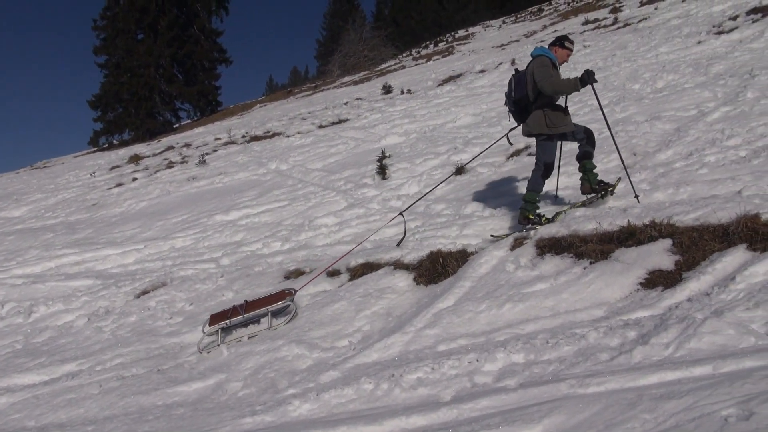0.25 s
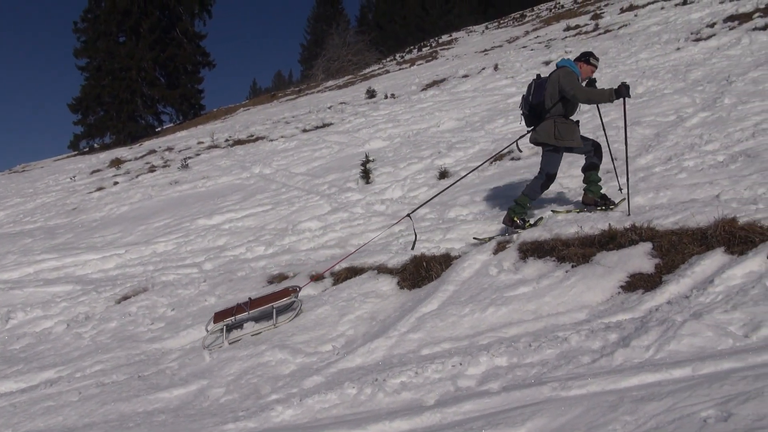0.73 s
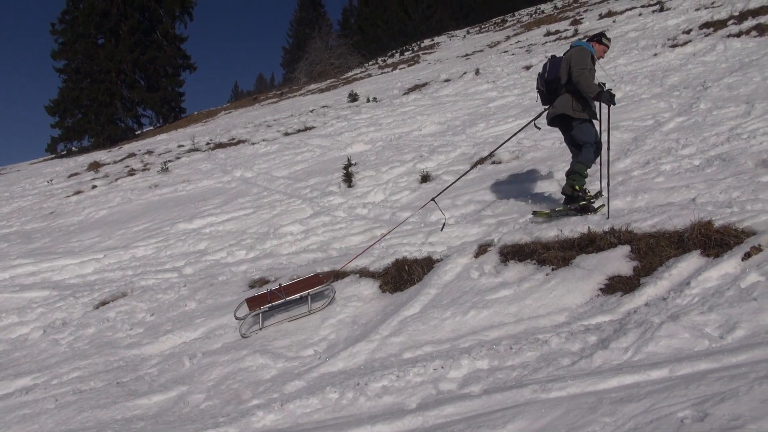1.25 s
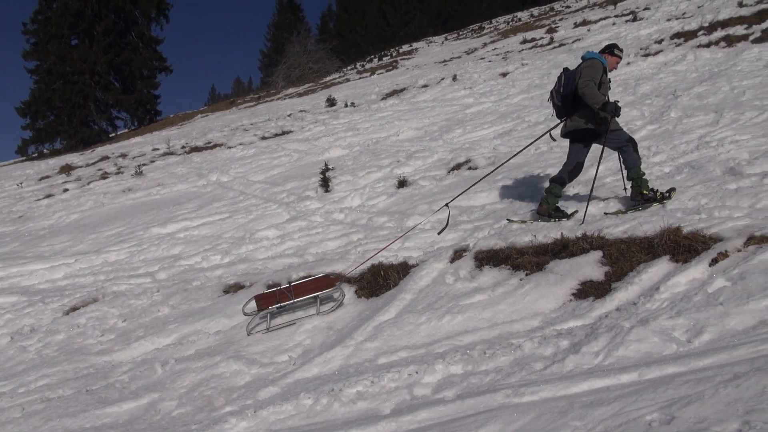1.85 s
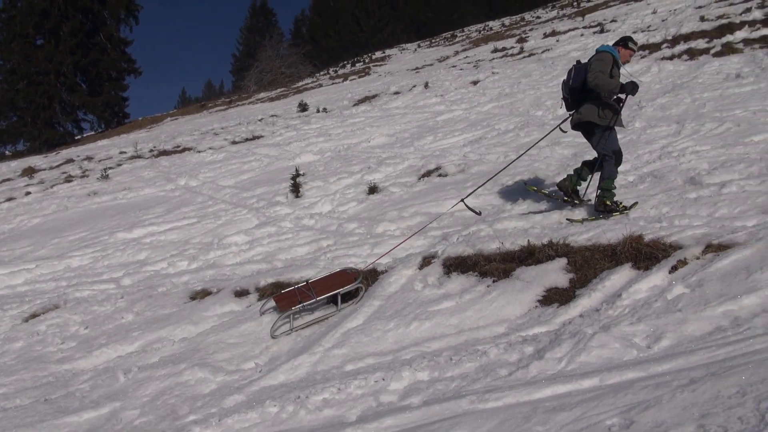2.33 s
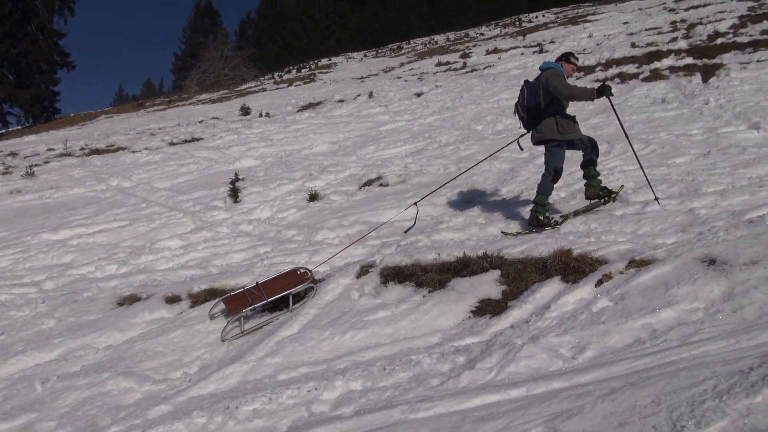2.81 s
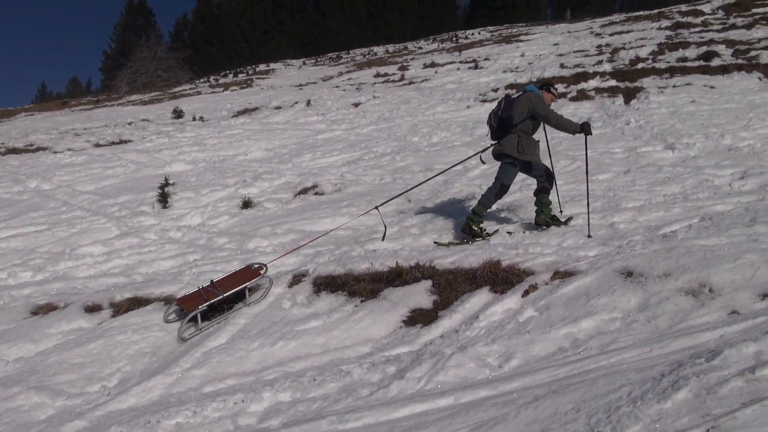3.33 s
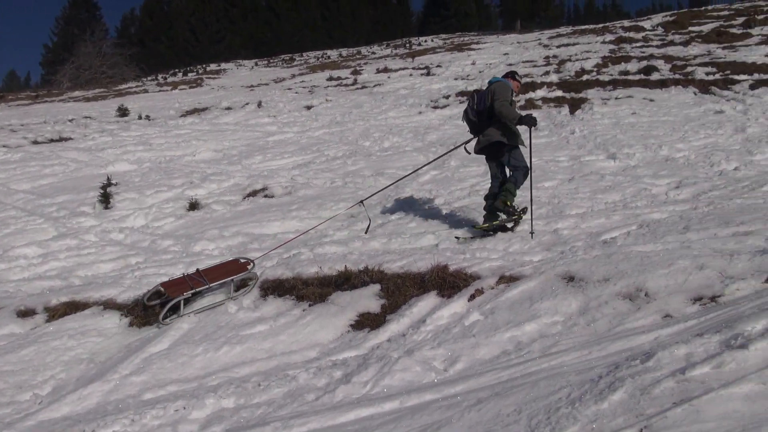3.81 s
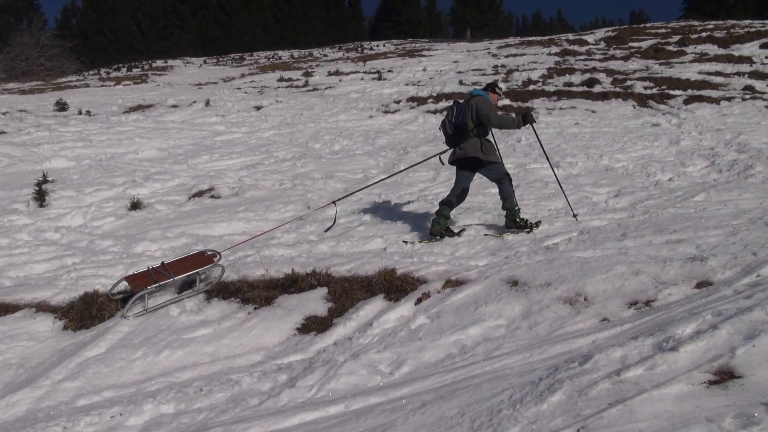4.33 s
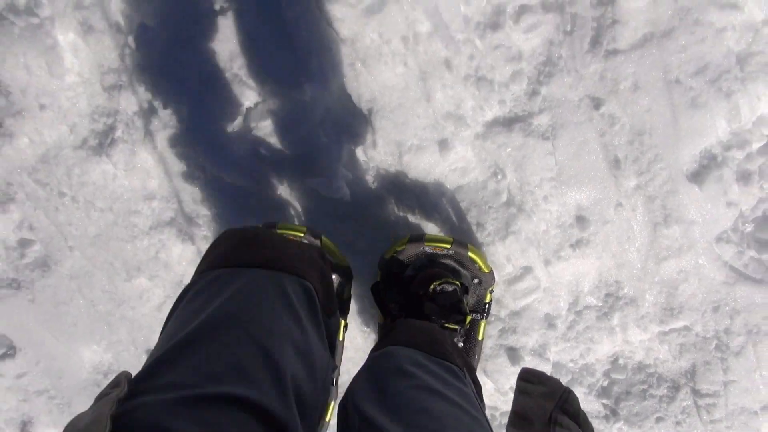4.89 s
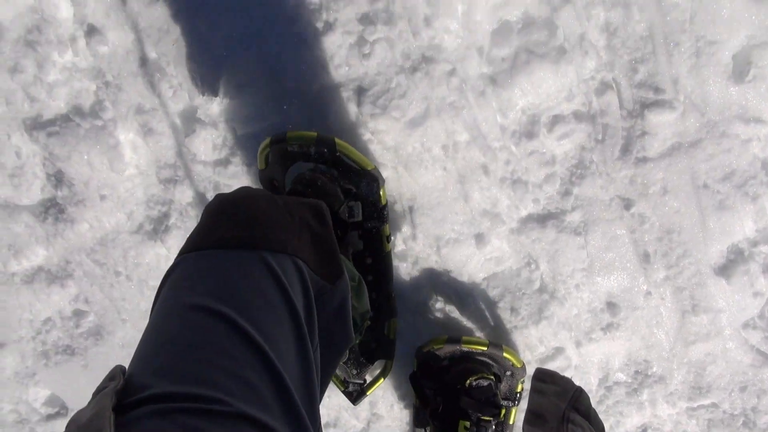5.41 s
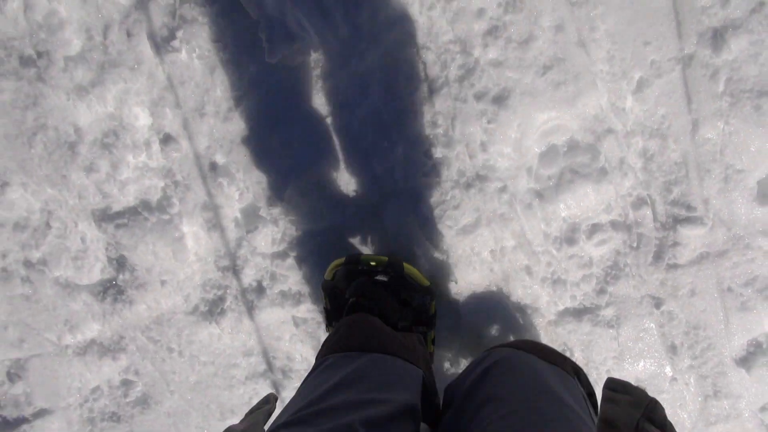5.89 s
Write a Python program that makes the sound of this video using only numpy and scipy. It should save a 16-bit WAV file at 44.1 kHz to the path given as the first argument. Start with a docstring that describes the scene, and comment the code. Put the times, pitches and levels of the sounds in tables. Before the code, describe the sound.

Someone on snowshoes climbs a quiet open slope, heard at a distance and left of centre: thin, hissy crunches of crusted snow, a dragging sled's faint rustle, small snaps and rattles of the tube frames. A pole knocks hard once, with a tiny bounce. Then the perspective jumps close and central: loud, dense, lumpy crushing underfoot with sharp cracks and dull clacks.

```python
"""A snowshoe walker with a hissing sled climbs crusted snow off to the right: noise bands swell at each crush.
Resonators add snaps, dry cracks, the rub of the tube frame and its hum under the distant crust.
From 2 s a faint sine holds, sinking slowly; at 3.6 s a pole knocks twice and its modes ring.
After 4.2 s the walker is right underfoot: louder crushes, clumps that stand out and a loaded, damped frame.
Scattered reflections and a bed of still air, made of coloured noise, surround it throughout."""
import sys
import numpy as np
from scipy import signal
from scipy.fft import rfft, irfft, next_fast_len
from scipy.io import wavfile

SR = 44100
rng = np.random.default_rng(int(sys.argv[2]) if len(sys.argv) > 2 else 0)


def to_wav(s):
    """Save 16-bit WAV."""
    ch = np.atleast_2d(s).T  # columns
    pcm = np.round(np.clip(ch, -1, 1) * 32767)  # PCM
    wavfile.write(sys.argv[1], SR, pcm.astype(np.int16))


N = 271202


def amp(db):
    """Logarithmic level: 20 dB is a factor of ten in amplitude."""
    return 10 ** (np.asarray(db) / 20)


def rms_one(x):
    """Normalisation of power: the mean square becomes one."""
    return x / np.sqrt(np.mean(x ** 2) + 1e-20)


def colour(x, spectrum, low_hz=10, high_hz=20000):
    """Linear filtering: a gain curve over log frequency, kept between two soft edges."""
    hz = np.arange(N // 2 + 1) * SR / N + 1   # the 1 keeps the logarithm finite
    points = np.array(spectrum)
    gain = amp(np.interp(np.log(hz), np.log(points[:, 0]), points[:, 1]))
    gain = gain / np.sqrt((1 + (low_hz / hz) ** 6) * (1 + (hz / high_hz) ** 6))
    # the transform runs at a fast length, so the gain is stretched to its bins
    size = next_fast_len(N)
    bins = np.linspace(0, 1, size // 2 + 1)
    gain = np.interp(bins, np.linspace(0, 1, len(hz)), gain)
    return irfft(rfft(x, size) * gain, size)[..., :N]


def drift(rate_hz):
    """Low-passed noise: a slow random curve of spread 1, computed at a tenth of the sample rate."""
    r = np.exp(-20 * np.pi * rate_hz / SR)
    noise = rng.standard_normal(N // 10 + 4002)
    slow = signal.lfilter([1], [1, -2 * r, r * r], noise)[4000:]   # drop the filter's start
    return np.interp(np.arange(N) / 10, np.arange(len(slow)), rms_one(slow))


def resonate(x, hz, width_hz):
    """Damped resonance: a pole pair with gain near 1 on top, ringing longer when narrow."""
    r = np.exp(-np.pi * width_hz / SR)
    poles = [1, -2 * r * np.cos(2 * np.pi * hz / SR), r * r]
    return signal.lfilter([(1 - r * r) / 2, 0, (r * r - 1) / 2], poles, x + 1e-18)


def breaks(per_s, spread_db):
    """Random impulses: fractures at chance times, of either sign and very uneven size."""
    sizes = amp(spread_db * np.minimum(rng.exponential(1, N), 2.6)) * rng.choice([-1, 1], N)
    return rms_one(sizes * (rng.random(N) < per_s / SR))


# nearness of the far walker (0-1), then the move to right underfoot
FAR_NEARNESS, ARRIVE_S, ARRIVE_LENGTH_S = 0.48, 4.24, 0.33
# left minus right; far off the balance drifts toward the middle
FAR_PAN_DB, PAN_DB_PER_S, NEAR_PAN_DB = -5.5, 0.7, -0.4


def place():
    """Interaural level difference: left-right balance in dB, and arrival from far (0) to underfoot (1)."""
    t = np.arange(N) / SR
    arrived = np.clip((t - ARRIVE_S) / ARRIVE_LENGTH_S, 0, 1)
    pan_db = (1 - arrived) * (FAR_PAN_DB + PAN_DB_PER_S * t) + arrived * NEAR_PAN_DB
    return pan_db, arrived


# relative spectra of the breaking crust far off and close by: frequency_hz, density_db
FAR_SPECTRUM = [(24, -60), (40, -8), (129, 2), (1380, -16.5), (1730, -11), (2390, -15), (3140, -7),
                (3930, -12), (9180, -4), (15500, -24)]
NEAR_SPECTRUM = [(24, -58), (40, -17), (235, -2.5), (903, -5), (1560, -0.5), (1770, -0.5), (3060, -8.5),
                 (8110, -16.5), (11200, -23.5), (15500, -49)]


def tread(arrived):
    """Band-wise modulation: one breaking crust is heard as thud, crunch, grit and crystals."""
    grit, thud, crunch, crystals = loads(arrived)
    near = np.clip(FAR_NEARNESS + (1 - FAR_NEARNESS) * arrived, 0, 1)
    raw = crust(near)
    bands = [(67, 720, thud), (997, 1670, crunch), (2430, 4400, grit), (5800, 28000, crystals)]
    out = 0
    for low_hz, high_hz, gain in bands:
        far_part = rms_one(colour(raw, FAR_SPECTRUM, low_hz, high_hz))
        near_part = rms_one(colour(raw, NEAR_SPECTRUM, low_hz, high_hz))
        part = (1 - near) * far_part + near * near_part
        # each grain size comes and goes a little on its own
        out = out + part * gain * amp(2.23 * drift(31.0))
    return out


def crust(near):
    """Brittle fracture: sharp cracks, ringing lumps and fine hiss; close by the lumps stand out."""
    cracks = breaks(3500, spread_db=4.0)
    lumps = breaks(600, spread_db=4.5)
    lump_size = rng.integers(0, 24, N)
    # every lump rings a few cycles at a pitch set by its size
    rung = 0
    for k, hz in enumerate(np.geomspace(150, 12000, 24)):
        rung = rung + resonate(lumps * (lump_size == k), hz, hz / 5.6) / np.sqrt(hz)
    rung = rms_one(colour(rung, [(100, -5.5), (12000, 9.5)]))
    hiss = rng.standard_normal(N)
    raw = amp(-9.5 + 7.4 * near) * cracks + amp(-8.5 + 4.2 * near) * rung + amp(5.0 - 6.4 * near) * hiss
    # the crust gives way in fits, a little deeper close by
    return rms_one(raw * amp((1.53 + 0.26 * near) * drift(65)))


# the rustle between crushes, sled and clothes far off, settling snow close by: time_s, level_db
RUSTLE_LEVEL = [(0, -54), (.7, -49.5), (1.7, -47.5), (2.7, -47.5), (4.1, -48), (4.6, -43.5), (4.9, -49),
                (5.5, -34.5), (6.15, -42.5)]
# rustle gains of grit, thud, crunch and crystals
RUSTLE_FAR_DB, RUSTLE_NEAR_DB = (-3, -5, -5, -2), (-7.5, 1.5, -8.5, -8)
# each time the crust gives way: start_s, length_s, grit_db (at the top of the swell),
# crunch_db (coarse lumps, re grit), thud_db (weight, re grit), bite_db (first bite, re top)
CRUSH_EVENTS = [(0.022, 0.016, -41, -24, -10, 0.5), (0.062, 0.023, -46, -3, -8, 4),
                (0.088, 0.017, -45, -3, 1.5, 1), (0.133, 0.056, -42, 0.5, -14, 2.5),
                (0.193, 0.091, -38, -16, -13, -7.5), (0.278, 0.069, -40.5, -14, -7, -14),
                (0.378, 0.072, -33.5, -39, -15.5, -4), (0.435, 0.13, -43, -5.5, -7.5, -2.5),
                (0.603, 0.063, -34, -57, -9, -3.5), (0.761, 0.18, -43.5, 2, 5, -5.5),
                (0.902, 0.078, -39.5, -0.5, -5.5, -1.5), (1.072, 0.048, -54, 9.5, -5, 5),
                (1.211, 0.026, -33, -50, -14, -4.5), (1.271, 0.046, -52, 7, -22, 3),
                (1.32, 0.011, -31.5, -0.5, -12, -1), (1.307, 0.077, -43.5, -2, 2, -14),
                (1.465, 0.15, -40, -12, -10, -0.5), (1.743, 0.25, -40, 1, -14, -17),
                (1.864, 0.17, -43.5, 3.5, 3.5, -2.5), (1.976, 0.29, -40.5, 2, -0.5, -5),
                (2.07, 0.17, -36, -5, -26, -16), (2.291, 0.18, -43, 1.5, -19.5, -7),
                (2.43, 0.049, -40.5, -6, -4, -20), (2.834, 0.034, -43, -13, -25, 5),
                (2.921, 0.066, -39, -3, -21, -5), (2.992, 0.17, -47.5, 3.5, -18, 0),
                (3.109, 0.088, -42, 2, -7, -12), (3.195, 0.12, -42.5, 0.5, -0.5, -3),
                (3.275, 0.096, -35.5, 2, -5, -7), (3.355, 0.21, -50, -0.5, -3.5, 3.5),
                (3.537, 0.09, -39, 0, -10.5, 5), (3.615, 0.2, -61.5, 7.5, -6, 17.5),
                (3.799, 0.063, -44, 7.5, -1.5, -3), (3.854, 0.068, -63, 20.5, -6.0, 5),
                (3.931, 0.063, -43, -9, -26, 3.5), (4.255, 0.21, -33.5, -8, -14, -15.5),
                (4.403, 0.17, -36.5, 10.5, 4.5, -3.5), (4.515, 0.1, -31, -5, 3.5, -4),
                (4.631, 0.027, -27.5, -2, -1.5, -5.5), (4.72, 0.011, -33, -36, -9.5, 5),
                (4.828, 0.013, -29.5, -14, -27, 0), (4.97, 0.054, -26.5, -1, -5, -14.5),
                (5.06, 0.046, -33.5, 8, -6, -7.5), (5.093, 0.096, -22, 0.5, -8.5, -2),
                (5.203, 0.053, -30.5, -2.5, -5, 3), (5.261, 0.091, -28.5, 1.5, -2, -19.5),
                (5.33, 0.065, -23.5, 1.5, -0.5, -5.5), (5.39, 0.14, -29.5, -6.5, -1, -2.5),
                (5.455, 0.046, -21.5, 1, -4, -3), (5.539, 0.082, -27, -7, 1.5, -6),
                (5.607, 0.037, -28.5, -12, 5.5, -2), (5.659, 0.021, -28, -7, 11, 1),
                (5.712, 0.058, -25, -7.5, -3, -2.5), (5.747, 0.087, -33.5, 2, 11.5, -12),
                (5.793, 0.11, -23.5, -3.5, -3, 0.5), (5.85, 0.093, -31.5, 10, 11.5, -6),
                (5.931, 0.028, -42, 9, 14, -15), (5.986, 0.042, -70.5, 29.5, 6, 9)]
BITE_S, TOP_SHARE, SAG_DB, LET_GO_S = 0.0081, 0.57, -10, 0.018   # top at this share of the length
# crystals re grit, share of the crunch column added, gain close by
CRYSTAL_DB, CRYSTAL_SHARE, CRYSTAL_NEAR_DB = -0.5, 0.41, -2.9


def loads(arrived):
    """Incoherent summation: the powers of rustle and every crush add to gains for the four bands."""
    t = np.arange(N) / SR
    rustle_db = np.interp(t, *np.transpose(RUSTLE_LEVEL))
    band_db = np.outer(RUSTLE_FAR_DB, 1 - arrived) + np.outer(RUSTLE_NEAR_DB, arrived)
    power = amp(2 * (rustle_db + band_db))   # doubled dB: power
    for start_s, length_s, grit_db, crunch_db, thud_db, bite_db in CRUSH_EVENTS:
        # quick bite, swell to the top, sag, then let go
        knots = start_s + np.array([0, BITE_S, TOP_SHARE * length_s, length_s, length_s + LET_GO_S])
        span = slice(round(start_s * SR), round(knots[-1] * SR))
        shape_db = np.interp(t[span], knots, [bite_db - 9.5, bite_db, 0, SAG_DB, -45])
        crystals_db = CRYSTAL_DB + CRYSTAL_SHARE * crunch_db + CRYSTAL_NEAR_DB * arrived[span.stop]
        parts_db = np.array([0, thud_db, crunch_db, crystals_db])[:, None]
        power[:, span] += amp(2 * (shape_db + grit_db + parts_db))
    return np.sqrt(power)


# modes of the tube frame before grip and load act: pitch_hz, width_hz, level_db
FRAME_MODES = [(1750, 130, 18.5), (1980, 540, -5), (2750, 250, -14), (3206, 125, -7), (4470, 280, -10),
               (5500, 890, -18.5)]
# underfoot the snow damps the frame: wider modes (factor) and a stronger third one
LOADED_WIDEN, LOADED_LIFT_DB = 1.9, 18


def frame(x, lowest_hz, upper_db, loaded):
    """Modal superposition: tube modes shifted by grip and load, with little sound between them."""
    shift = lowest_hz / FRAME_MODES[0][0]
    widen = LOADED_WIDEN ** loaded
    out = 0
    for k, (hz, width_hz, db) in enumerate(FRAME_MODES):
        level_db = db + upper_db * (k > 2) + LOADED_LIFT_DB * loaded * (k == 2)
        # two resonances in a row fall off steeply beside the mode
        mode = resonate(x, hz * shift, 2.0 * width_hz * widen)
        mode = resonate(mode, hz * shift, width_hz * widen)
        out = out + (-1) ** k * amp(level_db) * mode   # alternating sign
    return out


HUM_DB, HUM_UPPER_DB = -27.5, -7   # input re the crust, change of the upper modes


def frame_hum(crust_heard, arrived):
    """Forced vibration: far off, the breaking crust sets the frame humming."""
    hum = frame(crust_heard, FRAME_MODES[0][0], HUM_UPPER_DB, loaded=False)
    return amp(HUM_DB) * (1 - arrived) * hum


# something drags along a frame tube: start_s, peak_db, length_s, lowest_mode_hz, upper_modes_db
RUB_EVENTS = [(0.604, -27, 0.015, 1750, 9), (0.749, -25.5, 0.0096, 1870, -5), (0.766, -27, 0.0046, 1800, 2),
              (0.84, -23.5, 0.0085, 1750, 14), (0.854, -23.5, 0.008, 1810, 9),
              (2.081, -22, 0.0056, 1820, 7), (2.119, -14, 0.0069, 1890, 0), (2.129, -13.5, 0.011, 1754, 15),
              (2.319, -21.5, 0.01, 1750, 1), (2.352, -24.5, 0.022, 1750, 18), (2.378, -17, 0.004, 1820, -9),
              (2.383, -10.5, 0.0081, 1730, -5), (2.389, -16, 0.029, 1777, 14),
              (2.408, -6, 0.0089, 1743, 8.5), (2.439, -30, 0.0071, 1790, 3), (3.157, -17, 0.003, 1750, 3),
              (4.334, -19.5, 0.15, 1850, 10), (4.643, -10.5, 0.017, 1840, -5),
              (5.008, -9.5, 0.006, 1780, 10), (5.099, -6, 0.069, 1830, -3), (5.16, -16, 0.03, 1880, 5),
              (5.205, -10, 0.033, 1820, -9), (5.801, -9.5, 0.05, 1860, -1)]
SLIPS_PER_S, RASP, LOADED_RASP = 670, 0.09, 1.04   # slips re smooth friction, harsher underfoot
RUB_EDGE_S = 0.013   # longer rubs hold their level


def rubs():
    """Stick-slip friction: a short swell of smooth noise and random slips drives the frame modes."""
    out, t = np.zeros(N + 6000), np.arange(6000) / SR
    for start_s, peak_db, length_s, lowest_hz, upper_db in RUB_EVENTS:
        arch = np.sin(np.pi * np.clip(t / max(length_s, .002), 0, 1))
        swell = np.minimum(1, max(1, length_s / RUB_EDGE_S) * arch)
        loaded = start_s > ARRIVE_S
        smooth, slips = rng.standard_normal((2, len(t)))
        slips = rms_one(slips * (rng.random(len(t)) < SLIPS_PER_S / SR))
        friction = swell * (smooth + (LOADED_RASP if loaded else RASP) * slips)
        rung = frame(friction, lowest_hz, upper_db, loaded)
        at = round(start_s * SR)
        out[at:at + len(t)] += amp(peak_db) * rung / np.abs(rung).max()
    return out[:N]


# snaps of crust and clicks of binding: start_s, ring_peak_db, ring_hz, thud_db, edge_db
# (dull thud and bright edge are re the ring's peak)
SNAP_EVENTS = [(0.205, -22, 4080, -26, -12), (0.419, -19.5, 2510, -22, -22), (0.507, -21, 3100, -24, -19),
               (0.647, -14, 3230, -15.5, -28), (1.22, -19, 2200, -23, -26), (1.325, -28, 940, -6, 2),
               (1.354, -22.5, 2300, -12, -14), (2.507, -31.5, 2830, -5, 10.5), (2.601, -26, 2990, 2.5, -10),
               (3.672, -26, 1200, -9, -12), (3.765, -23.5, 1180, -14, -4.5), (4.423, -24, 1380, 4, 3),
               (4.447, -10, 1280, -26, -23), (4.46, -13.5, 1450, -25, -22), (4.479, -11, 1310, -19, -20),
               (4.524, -14, 1330, -12, -4.5), (4.97, -20, 2600, 4, 5), (4.997, -15, 1770, -4, -2),
               (5.048, -19, 1750, -32, 0.5), (5.098, -8, 1980, -31, -5), (5.537, -11, 1920, -2, -5),
               (5.624, -9.5, 1700, -21, -12), (5.649, -10, 2550, -10, -14), (5.796, -13, 1910, -11, 0),
               (5.99, -8.5, 2550, -15, -35), (6.016, -20, 734, -23, -29), (6.026, -32, 1460, 15, -18),
               (6.036, -16, 880, -7.5, -36)]
SNAP_T60_S = 0.028   # of the burst into the thud; the ring's burst dies in half of it


def snaps():
    """Impulsive excitation: short noise bursts drive a ring, a dull thud and a bright edge."""
    out, t = np.zeros(N + 4096), np.arange(4096) / SR
    fade = amp(-60 * t / SNAP_T60_S)
    for start_s, peak_db, ring_hz, thud_db, edge_db in SNAP_EVENTS:
        burst = rng.standard_normal((3, 4096)) * (1 - np.exp(-t / 0.00019))
        ring = resonate(burst[0] * fade ** 2, ring_hz, ring_hz / 8)
        thud = resonate(burst[1] * fade, 240, 510)
        edge = resonate(resonate(burst[2] * fade ** 1.03, 5000, 6500), 5700, 6300)
        ring, thud, edge = [p / np.abs(p).max() for p in (ring, thud, edge)]
        at = round(start_s * SR)
        out[at:at + 4096] += amp(peak_db) * (ring + amp(thud_db) * thud + amp(edge_db) * edge)
    return out[:N]


# dry single cracks of the crust: start_s, peak_db, centre_hz
CRACK_EVENTS = [(0.633, -18, 3170), (0.778, -21, 3380), (0.937, -29, 1520), (0.956, -22, 1720),
                (1.488, -32.5, 3190), (1.608, -23, 1690), (1.635, -24, 3180), (2.355, -17, 2600),
                (3.729, -26, 1290), (3.815, -31, 1620), (3.844, -24, 1740), (3.978, -29, 3170),
                (4.507, -16, 1510), (4.532, -3.5, 2660), (4.576, -10, 805), (5.306, -15, 1750),
                (5.344, -16, 1580), (5.356, -10, 1390), (5.37, -8, 1930), (5.378, -8, 1810),
                (5.384, -1, 1800), (5.478, -5, 2600), (5.487, -17, 2610), (5.558, -14, 1640),
                (5.562, -13, 1790), (5.566, -6, 1780), (5.579, -8.5, 3400), (5.594, -8, 1700),
                (5.725, -8, 1980), (5.732, -15, 1770), (5.739, -4, 1930), (5.909, -18, 1240),
                (5.927, -9.5, 1040)]
CRACK_WIDTH_SHARE, CRACK_S = 0.23, 0.00033   # width re centre; decay time of the break


def dry_cracks():
    """Impulse response: each very short break is heard through one broad resonance."""
    out, t = np.zeros(N + 512), np.arange(512) / SR
    for start_s, peak_db, hz in CRACK_EVENTS:
        burst = rng.standard_normal(512) * np.exp(-t / CRACK_S)
        crack = resonate(burst, hz, CRACK_WIDTH_SHARE * hz)
        at = round(start_s * SR)
        out[at:at + 512] += amp(peak_db) * crack / np.abs(crack).max()
    return out[:N]


# a pole knocks on something hard and bounces: start_s, peak_db
KNOCK_EVENTS = [(3.566, -9), (3.57, -9)]
# modes of the pole: pitch_hz, level_db, t60_s
POLE_MODES = [(985, 1.5, 0.047), (1930, 8.5, 0.028), (3190, 6, 0.029), (4870, -5, 0.021), (5950, -2, 0.02),
              (7620, 3, 0.017), (10700, -21, 0.018)]
KNOCK_S, KNOCK_CRACK_DB = 0.0022, 9   # decay time of the contact; its own crack on the modes' dB scale


def knocks():
    """Struck modes: a short rough contact cracks and leaves the pole ringing freely."""
    out, t = np.zeros(N + 4096), np.arange(4096) / SR
    for start_s, peak_db in KNOCK_EVENTS:
        contact = rng.standard_normal(4096) * np.exp(-t / KNOCK_S)
        crack = resonate(resonate(contact, 3500, 8500), 4000, 9000)
        rung = amp(KNOCK_CRACK_DB) * rms_one(crack)
        for hz, db, t60_s in POLE_MODES:
            width_hz = np.log(1000) / np.pi / t60_s   # 60 dB is a factor of 1000
            rung = rung + amp(db) * rms_one(resonate(np.exp(-t * hz), hz, width_hz))
        at = round(start_s * SR)
        out[at:at + 4096] += amp(peak_db) * rung / np.abs(rung).max()
    return out[:N]


# share of the sound that shows the direction: frequency_hz, gain_db
DIRECTION_SPECTRUM = [(300, -17), (1200, -1), (2400, 3.5), (5000, 3.5), (9000, -12.5), (15000, -24)]


def placed(walker, pan_db):
    """Frequency-dependent panning: only part of the spectrum carries the level difference."""
    return walker + colour(walker, DIRECTION_SPECTRUM) * (amp([pan_db / 2, -pan_db / 2]) - 1)


# reflected sound that is unlike in the two channels: frequency_hz, gain_db
SCATTER_SPECTRUM = [(30, -38), (300, -16), (2000, -18.5), (7000, -10.5), (14000, -10.5)]


def scattered(walker):
    """Diffuse reflection: short echoes, opposite in the channels, strength and sign wandering at random."""
    echoes = rng.standard_normal(400) * np.exp(-np.arange(400) / 180.0)
    reflected = signal.fftconvolve(walker, echoes / np.linalg.norm(echoes))[:N]
    return colour(reflected, SCATTER_SPECTRUM) * drift(22.4) * [[1], [-1]]


TONE_HZ, TONE_S, TONE_LENGTH_S = 578, 2.03, 2.38
TONE_DB, TONE_DB_PER_S = -53, -1.5   # RMS level at the start, and its slope


def tone():
    """Simple harmonic motion: a faint sine holds, sinking slowly, then fades."""
    t = np.arange(N) / SR - TONE_S
    gate = np.clip(t / 0.014, 0, 1) * np.clip((TONE_LENGTH_S - t) / 0.22, 0, 1)
    level = np.sqrt(2) * amp(TONE_DB + TONE_DB_PER_S * t)   # RMS to peak
    return gate * level * np.sin(2 * np.pi * TONE_HZ * t)


# relative spectrum of the still air: frequency_hz, density_db
AIR_SPECTRUM = [(18, -30), (45, 0), (135, 3), (889, 1), (1880, -4), (9370, -21.5), (15000, -16)]
AIR_DB = -52   # RMS


def still_air():
    """Partly coherent noise: a common part plus a weaker part opposite in the channels."""
    mid, side = colour(rng.standard_normal((2, N)), AIR_SPECTRUM)
    return amp(AIR_DB) * rms_one(mid + 0.55 * side * [[1], [-1]])


def scene():
    """Superposition: the walker placed left to right, scattered off the snow, over tone and still air."""
    pan_db, arrived = place()
    crust_heard = tread(arrived)
    walker = crust_heard + frame_hum(crust_heard, arrived) + rubs() + snaps() + dry_cracks() + knocks()
    return placed(walker, pan_db) + scattered(walker) + tone() + still_air()


STOP_HZ = 15900   # from here up the sound is 70 dB down


def record(dry):
    """Saturation and low-pass filtering: loud peaks are rounded, the top is cut steeply."""
    rounded = .8 * np.tanh(dry / .8)
    return signal.sosfilt(signal.cheby2(14, 70, STOP_HZ, fs=SR, output="sos"), rounded)


dry = scene()
out = record(dry)
to_wav(out)
```